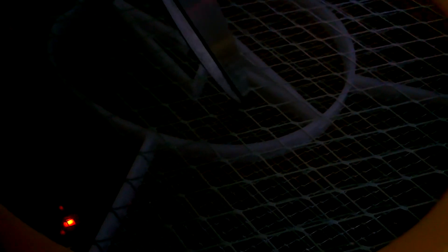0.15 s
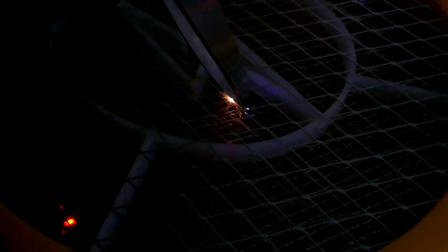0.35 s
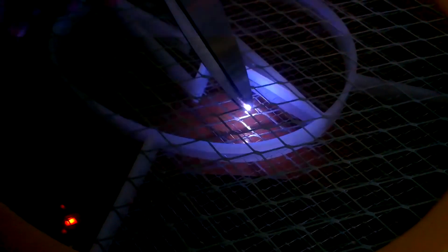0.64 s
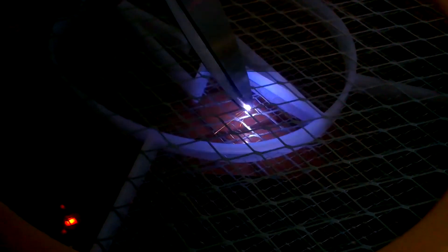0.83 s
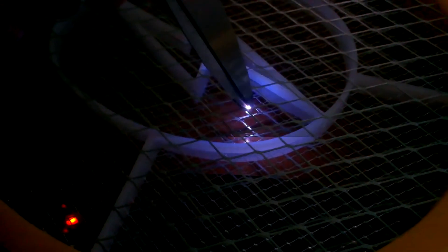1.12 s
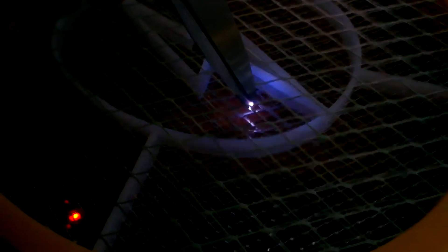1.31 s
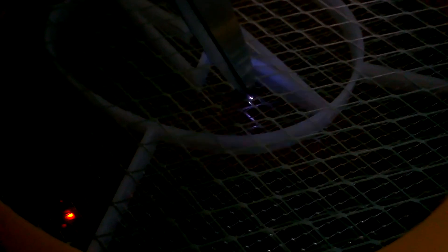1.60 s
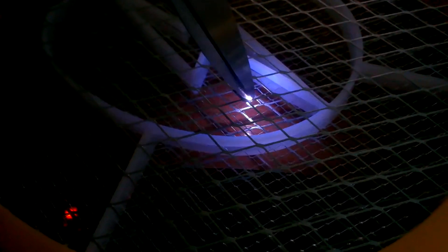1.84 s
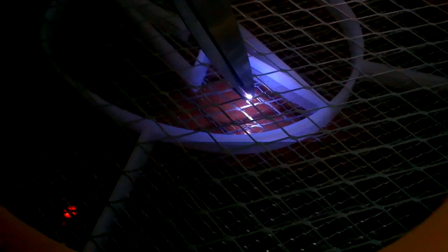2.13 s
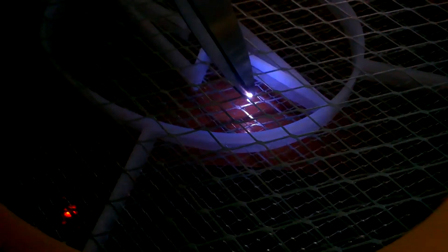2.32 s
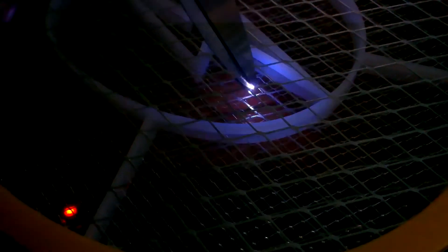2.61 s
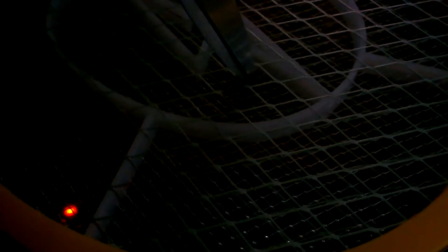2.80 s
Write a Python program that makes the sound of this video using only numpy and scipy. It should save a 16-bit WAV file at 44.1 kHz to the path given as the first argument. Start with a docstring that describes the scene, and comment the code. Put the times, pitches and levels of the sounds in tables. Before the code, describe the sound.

Sharp, loud cracks of high-voltage sparks on metal mesh, close up, over a spitting sizzle.

```python
"""High-voltage sparks snap across a wire mesh, close to two microphones in a quiet room.
Each spark is a sharp crack with a table echo; big ones add a falling thump and overload the input.
Between sparks the arc sizzles in spits of tiny discharges. Faint hiss lies underneath.
The input gain ducks briefly after loud sparks."""
import sys
import numpy as np
from scipy import signal
from scipy.io import wavfile
from scipy.ndimage import uniform_filter1d

SR = 44100
rng = np.random.default_rng(int(sys.argv[2]) if len(sys.argv) > 2 else 0)


def dump(signal):
    """Clip the signal to [-1, 1] and save it as 16-bit WAV at the path in sys.argv[1]."""
    limited = np.clip(np.atleast_2d(signal).T, -1, 1)
    pcm = np.round(limited * 32767).astype(np.int16)
    wavfile.write(sys.argv[1], SR, pcm)


N = 130095

# Discharges: start_s, crack_db, thump_db
SPARKS = [(0.2116, -1.5, -18), (0.2458, -21.5, -64), (0.383, -25.5, -60), (0.3905, -15.5, -63),
          (0.4427, -20, -63), (0.4534, -10.5, -61), (0.4653, -8.5, -43), (0.4859, -2.5, -45),
          (0.5307, 1, -4.5), (0.5632, -5, -19), (0.626, 2, -3.5), (0.6703, 3.5, -8.5), (0.6991, -12.5, -32),
          (0.7162, -21.5, -42), (0.7303, -13.5, -47), (0.7456, -6, -40), (0.7745, -3, -16),
          (0.804, -2.5, -23.5), (0.8275, -7, -16), (0.8497, -7, -20), (0.8904, -3, -13.5),
          (0.9199, -4.5, -24), (0.9761, 1.5, -5.5), (1.0077, -8.5, -16.5), (1.0448, -5.5, -10.5),
          (1.0892, 0.5, -12.5), (1.1209, -9, -19), (1.148, -5.5, -23.5), (1.179, -3, -16.0),
          (1.2088, -5, -20), (1.2319, -5.5, -25), (1.2494, -8.5, -52), (1.261, -16, -53), (1.2748, -7, -35),
          (1.2952, -3, -33), (1.3225, -1.5, -15), (1.3382, -9, -67), (1.3514, -12, -40), (1.3593, -12, -55),
          (1.3716, -24, -63), (1.433, -17, -46.0), (1.4523, -5, -43), (1.4751, -4, -50.5),
          (1.4893, -7, -50), (1.502, -9.5, -50), (1.516, -9.0, -48), (1.527, -7, -52), (1.5384, -9, -54),
          (1.55, -8, -55), (1.562, -7, -55), (1.5773, -10.5, -49), (1.5944, -5.5, -55), (1.6116, -8, -56),
          (1.6235, -13.5, -57), (1.8662, -4, -19.5), (1.9135, -4, -52), (1.936, -12, -36), (1.95, -18, -59),
          (1.9613, -19.5, -54), (1.97, -16, -57), (1.9808, -13.5, -52), (1.9901, -16.5, -58),
          (2.016, -2.5, -25.5), (2.067, 0, -6), (2.1113, 0.5, -11), (2.1474, -8.5, -29), (2.2265, 2.5, -3),
          (2.261, -5, -13.5), (2.2931, -6, -34), (2.3354, -2, -13.5), (2.3787, -0.5, -5), (2.4232, 0, -9),
          (2.456, -4.5, -46), (2.5254, -0.5, -4.5), (2.5877, 7.5, -6.5), (2.6114, -16, -46),
          (2.6403, -15.5, -25), (2.6622, 1, -12.5)]


def amp(db):
    return 10 ** (np.asarray(db) / 20)


def unit_rms(x):
    return x / np.sqrt(np.mean(x ** 2) + 1e-20)


def curve_at(curve, hz):
    freq_hz, value = np.transpose(curve)
    return np.interp(np.log(hz + 1), np.log(freq_hz + 1), value)


def butter(x, order, hz, kind):
    return signal.sosfilt(signal.butter(order, hz, kind, fs=SR, output="sos"), x)


def allpass(x, coeff, stages):
    """Phase smear: treble passes first, lows later."""
    return signal.sosfilt(np.tile([-coeff, 1, 0, 1, -coeff, 0], (stages, 1)), x)


def colour(x, curve):
    """Minimum-phase filter from rows of freq_hz, gain_db."""
    log_gain = np.log(amp(curve_at(curve, abs(np.fft.fftfreq(4096, 1 / SR)))))
    taps = np.fft.ifft(np.exp(np.conj(signal.hilbert(log_gain)))).real
    return signal.oaconvolve(x, taps)[:N]


def hiss():
    """Steady noise floor, independent per channel."""
    # Noise spectrum: freq_hz, relative_db
    spectrum = [(60, -38), (302, -5), (960, -14.5), (2060, -18.5), (3500, -6.5), (5430, -29), (15000, -30)]
    level_db = -73
    noise = np.array([colour(white, spectrum) for white in rng.standard_normal((2, N))])
    return amp(level_db) * unit_rms(noise)


def room_reverb(x):
    """Diffuse tail per channel; each band decays at its own rate."""
    # Room decay: freq_hz, t60_s
    decay = [(300, 0.09), (3000, 0.11), (8000, 0.14), (15000, 0.4)]
    level_db, onset_s = -15, 0.0042
    hz, t, bands = signal.stft(rng.standard_normal((2, SR // 2)), SR, nperseg=128)
    tail = signal.istft(bands * amp(-60 * t / curve_at(decay, hz)[:, None]), SR)[1]
    tail *= np.arange(tail.shape[1]) > onset_s * SR
    return amp(level_db) * signal.fftconvolve(x, tail / np.linalg.norm(tail[0]), axes=1)[:, :N]


def arc_sizzle():
    """Dense tiny discharges in spits; treble and low mids shift as the arc changes."""
    # Arc envelope: time_s, level_db
    envelope = [(0.206, -69), (0.222, -34.5), (0.285, -23.5), (0.318, -16), (0.379, -28), (0.388, -9.5),
                (0.432, -36.5), (0.529, -34.5), (0.569, -26.5), (0.595, -40.5), (0.655, -36.5),
                (0.67, -24.5), (0.883, -34), (1.008, -38.5), (1.037, -47), (1.096, -20.5), (1.177, -33),
                (1.201, -30), (1.371, -24), (1.414, -48.5), (1.438, -29), (1.619, -23.5), (1.664, -39.5),
                (1.789, -74), (1.827, -61.5), (1.844, -38.5), (1.891, -52), (1.961, -27), (2.06, -41),
                (2.153, -25.5), (2.213, -54), (2.24, -21.5), (2.365, -50.5), (2.464, -27.5), (2.518, -50),
                (2.53, -23.5), (2.56, -33.5), (2.583, -28.5), (2.611, -30), (2.659, -29.5), (2.896, -71)]
    # Arc tone relative to the mid band: time_s, treble_db, lows_db
    tone = [(.28, 12, -31), (0.345, -0.5, -30), (.4, 2.5, -17.5), (.5, 7.5, -12), (.68, 5, -1),
            (1.66, 5.5, -8.5), (1.8, -23.5, -6.5), (1.9, -0.5, -6), (2.635, 11.5, -11), (2.658, 15.5, 14),
            (2.711, 2, -10), (2.851, -15.5, -0.5)]
    gain_db, spit_s, spit_depth_db, common_gain = 2, 0.018, 4, 0.47
    t = np.arange(N) / SR
    level_s, level_db = np.transpose(envelope)
    tone_s, treble_db, lows_db = np.transpose(tone)
    spits = unit_rms(signal.lfilter([1], [1, -np.exp(-1 / (spit_s * SR))], rng.standard_normal(N)))
    noise = rng.standard_normal((3, N))  # left, right, common
    stereo = common_gain * noise[2] + np.sqrt(1 - common_gain ** 2) * noise[:2]
    grains = unit_rms(amp(spit_depth_db * spits) * stereo)
    lows = amp(np.interp(t, tone_s, lows_db)) * butter(grains, 3, 2000, "low")
    mids = butter(grains, 3, (2000, 5500), "band")
    treble = amp(np.interp(t, tone_s, treble_db)) * butter(grains, 3, 5500, "high")
    return (lows + mids + treble) * amp(gain_db + np.interp(t, level_s, level_db, -120, -120))


def spark_thumps():
    """Short ring per spark, falling in pitch; stronger pushes ring lower."""
    base_period_s, stretch_per_db = 0.0056, 0.1
    decay_periods, glide_periods, glide_cycles = 0.26, 0.52, 0.63
    gain_db, jitter_s = 16, 0.0008
    channels = [(0.63, 0.000964, 0), (1, 0.000932, 3)]  # left, right: period_ratio, lag_s, trim_db
    thumps, t = np.zeros((2, N)), np.arange(700) / SR
    for start_s, _, thump_db in SPARKS:
        detune, jitter = rng.random((2, 2))
        for ch, (period_ratio, lag_s, trim_db) in enumerate(channels):
            stretch = np.exp(stretch_per_db * max(thump_db, -25) + 0.18 * (detune[ch] - 0.5))
            periods = t / (base_period_s * period_ratio * stretch)
            cycles = periods + glide_cycles * (1 - np.exp(-periods / glide_periods))
            ring = np.exp(-periods / decay_periods) * np.sin(2 * np.pi * cycles)
            i = round((start_s + lag_s + jitter_s * jitter[ch]) * SR)
            thumps[ch, i:i + len(t)] += amp(gain_db + thump_db + trim_db) * ring
    return thumps


def spark_cracks():
    """Sharp click and short sputter per spark, heard direct and off the table."""
    # Table reflection: delay_s, level_db
    echoes = [(.0022, -15.5)]
    direct = (0.0014, 0.12)  # delay_s, level_db
    gain_db, sputter_db, sputter_s = 14, -8, 0.00092
    cracks, t = np.zeros((2, N)), np.arange(700) / SR
    click = t == 0
    sputter_envelope = amp(sputter_db) * t / sputter_s * np.exp(-t / sputter_s)
    for start_s, crack_db, _ in SPARKS:
        bright_noise = np.diff(rng.standard_normal((2, len(t))), prepend=0)
        crack = click + sputter_envelope * bright_noise
        for delay_s, path_db in [direct] + echoes:
            i = round((start_s + delay_s) * SR)
            cracks[:, i:i + len(t)] += amp(gain_db + crack_db + path_db) * crack
    return cracks


def scene():
    """Cracks, sizzle and reverb through two microphone ports, plus thumps and hiss."""
    # Left port response: freq_hz, gain_db
    left_port = [(200, -12.5), (600, 4), (1100, 3.5), (2000, -3), (2800, 8.5), (3400, 2.5), (4400, -5),
                 (7000, -7.5), (9500, -4.5), (15000, -15)]
    # Right port response: freq_hz, gain_db
    right_port = [(200, -17.5), (600, -5), (2100, -4), (2940, 16.5), (3150, 14.5), (3400, 14.5),
                  (4300, -7.5), (5200, -2.5), (7200, -12.5), (15000, -12)]
    cracks, thumps = spark_cracks(), spark_thumps()
    air = cracks + arc_sizzle()
    air += room_reverb(air)
    return np.array([colour(air[0], left_port), colour(air[1], right_port)]) + thumps + hiss()


def record(dry):
    """Input chain: low cut, phase smear, ducking after loud sparks, hard overload, band limit."""
    low_cut_hz, high_cut_hz, ceiling = 151, 15000, 0.99
    threshold_db, duck_share, release_db_per_s = -7, 0.52, 405
    trailing_window = dict(size=161, origin=80)
    x = butter(dry, 2, low_cut_hz, "high")
    x = allpass(x, 0.93, stages=2)
    x = allpass(np.roll(x, -24, axis=1), 0.5, stages=16)  # advance offsets part of the delay
    power_db = 10 * np.log10(abs(uniform_filter1d((x ** 2).mean(0), **trailing_window)) + 1e-12)
    release_db = np.arange(N) * release_db_per_s / SR
    held_db = np.maximum.accumulate(power_db + release_db) - release_db
    excess_db = np.maximum(held_db - threshold_db, 0)
    duck_db = duck_share * uniform_filter1d(excess_db, **trailing_window)
    x = np.clip(x / amp(duck_db), -ceiling, ceiling)
    lowpass = signal.firwin(201, high_cut_hz, window=("kaiser", 7), fs=SR)
    return np.clip(signal.oaconvolve(x, lowpass[None], "same"), -1, 1)


dry = scene()
out = record(dry)
dump(out)
```